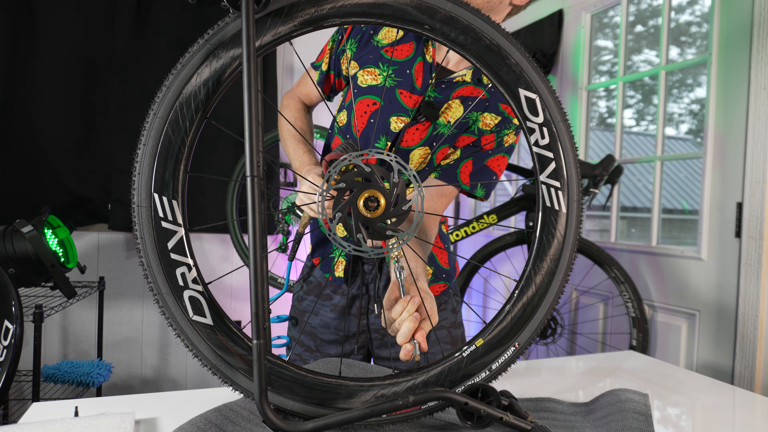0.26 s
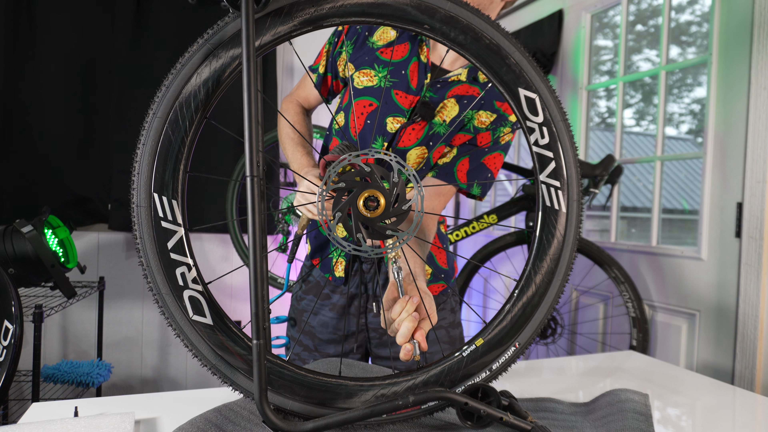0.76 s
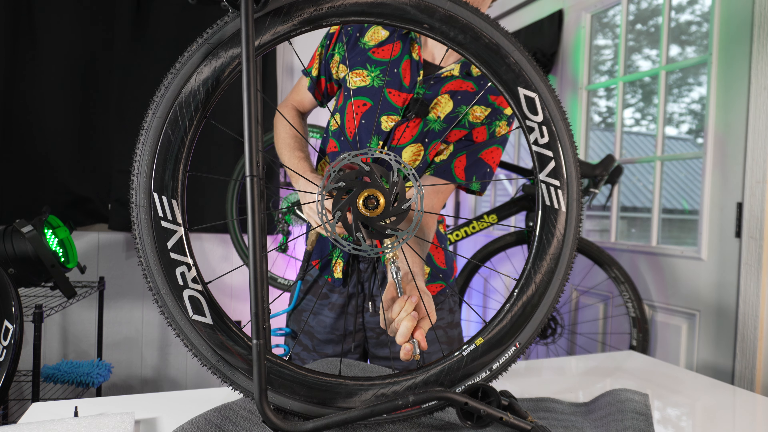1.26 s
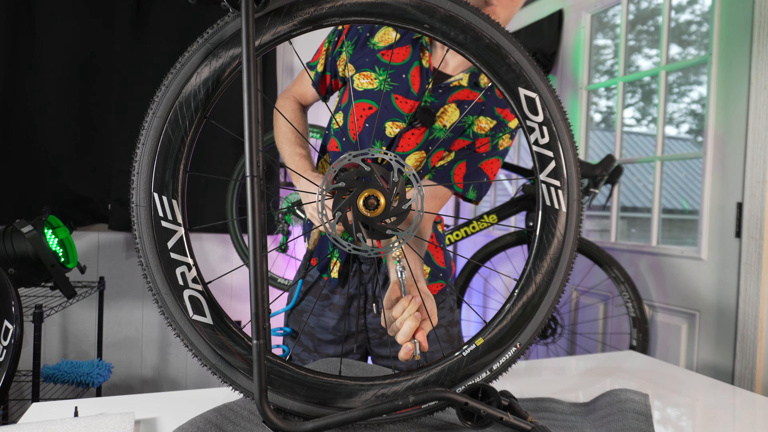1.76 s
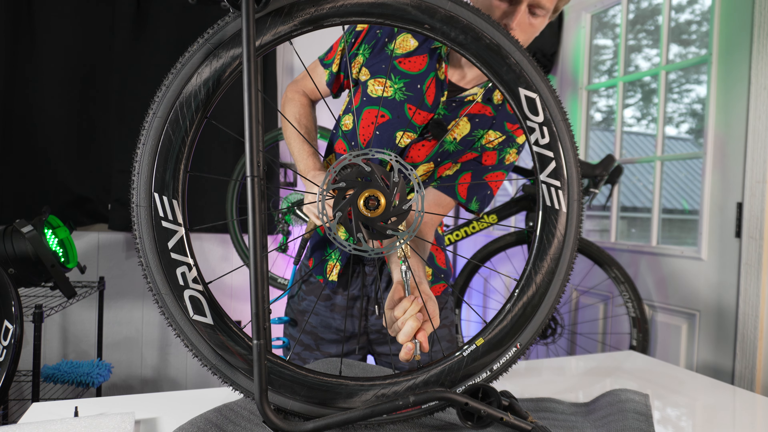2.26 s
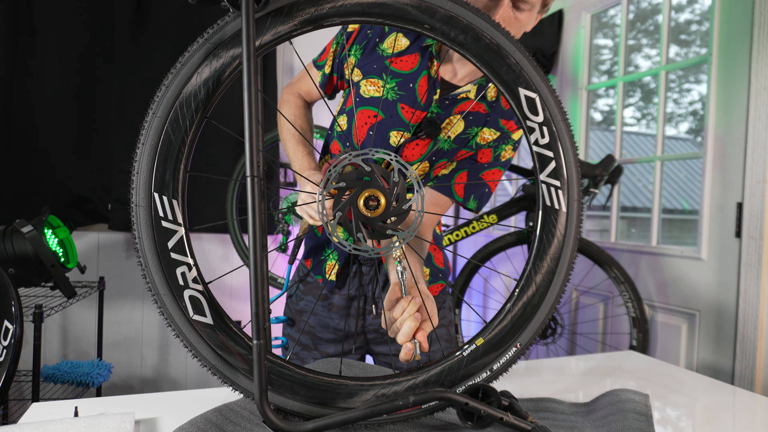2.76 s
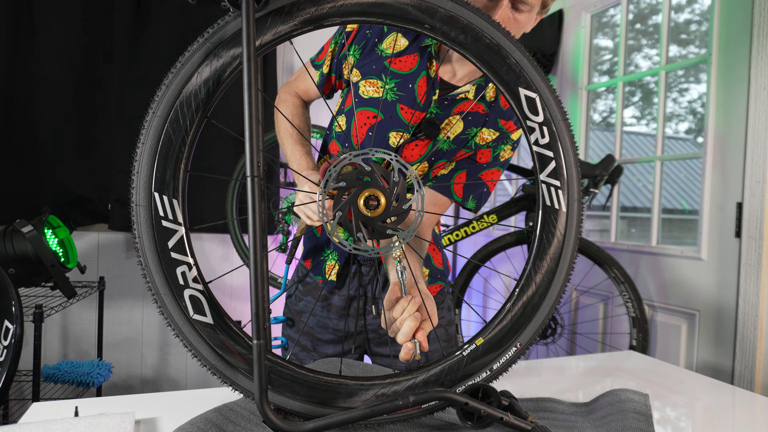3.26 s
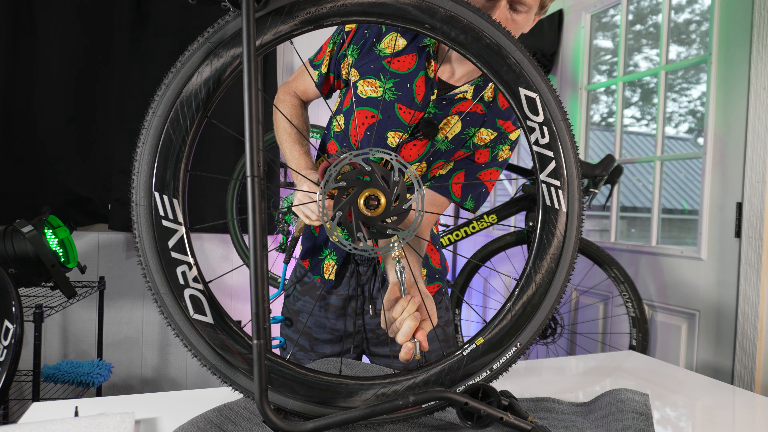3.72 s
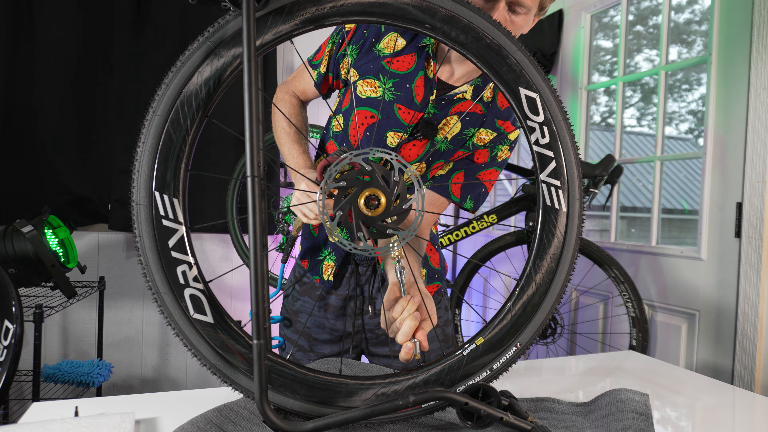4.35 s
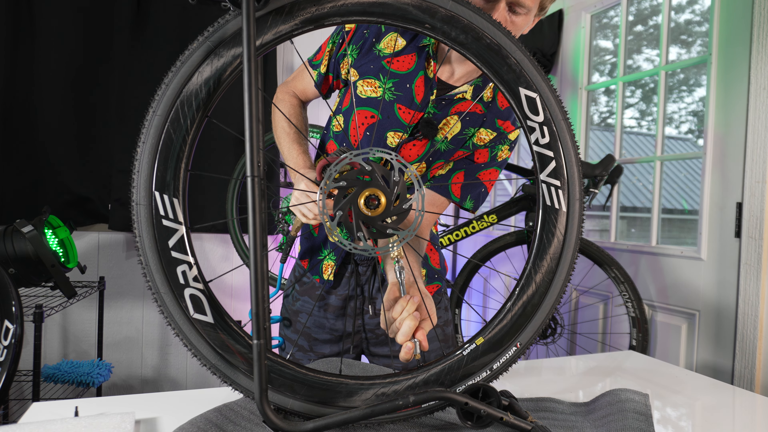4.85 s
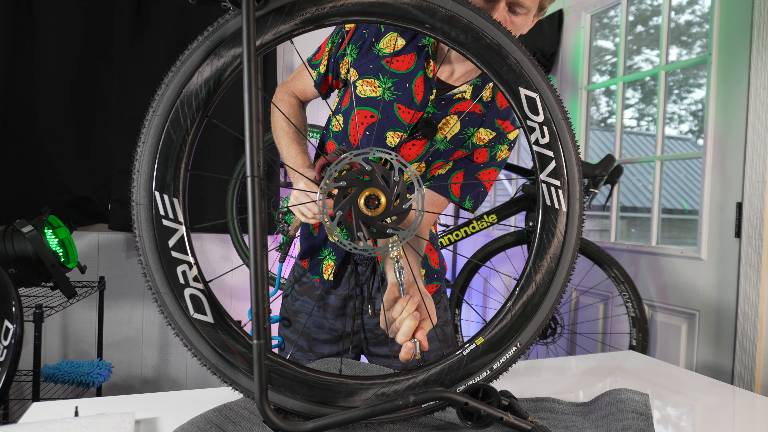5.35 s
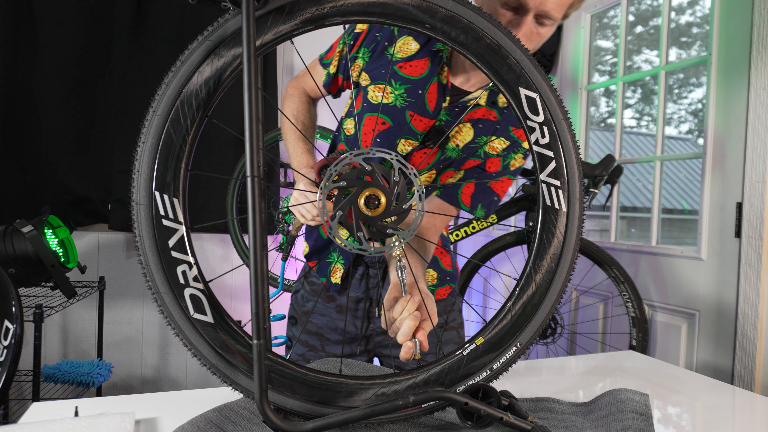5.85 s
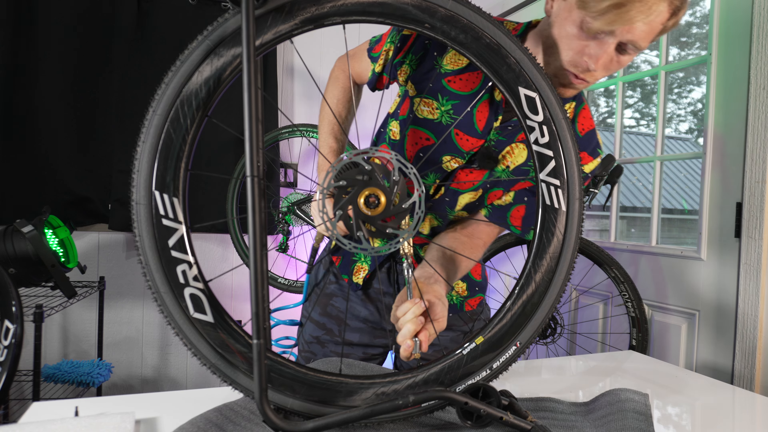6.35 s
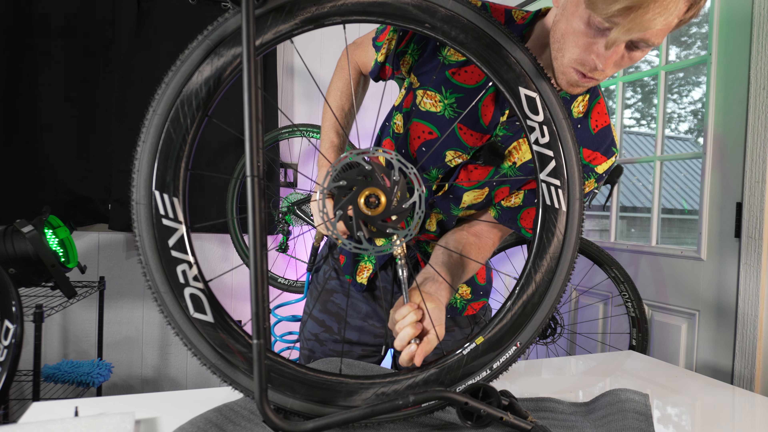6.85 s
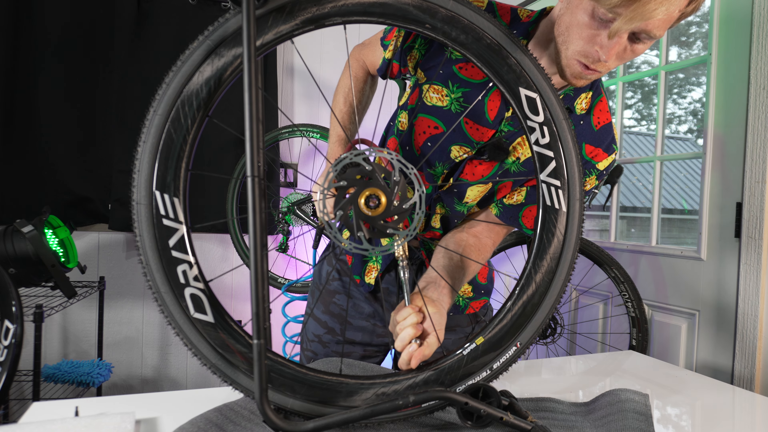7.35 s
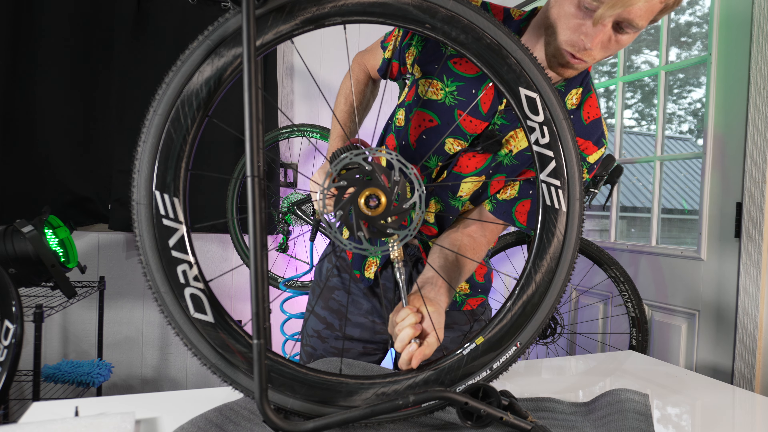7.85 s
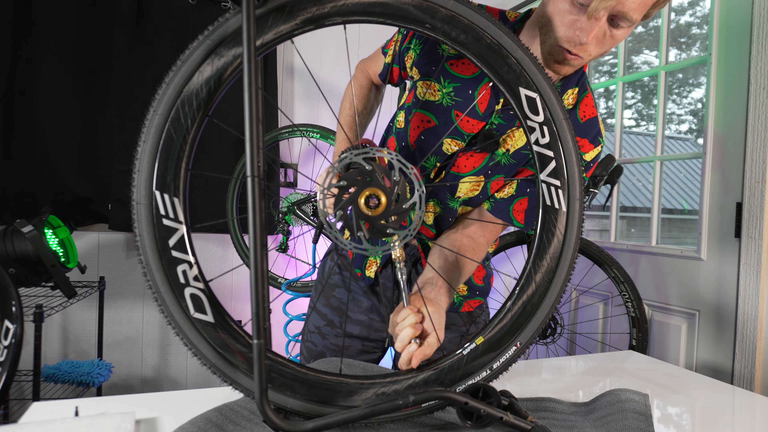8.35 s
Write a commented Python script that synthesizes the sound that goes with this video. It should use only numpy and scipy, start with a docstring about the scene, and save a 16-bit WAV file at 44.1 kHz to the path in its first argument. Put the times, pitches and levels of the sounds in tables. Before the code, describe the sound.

In a small workshop, a close microphone hears bright compressed air hissing and faintly singing through a tire valve. A trigger snaps, the hiss drops to a seep, then another snap restarts it. Tiny ticks and a sharp tire knock follow. Hands rumble and scrape the wheel, then air blasts out in a loud breathy jet, with a hard click before it fades to a thin leak.

```python
"""A small workshop: a bicycle tire is filled from a compressed-air inflator, heard by one microphone.
Air leaks at the chuck as coloured noise and sings in the valve as noise caught in resonances.
The trigger snaps shut and open, the tire ticks and knocks on its rim as it swells: noise bursts, damped modes.
The chuck is worked loose with rumbles and scrapes; air blows off in a loud fluttering, whistling jet
for a second, and a thinner leak goes on."""
import sys
import numpy as np
from scipy import signal
from scipy.fft import rfft, irfft, next_fast_len
from scipy.io import wavfile
from scipy.ndimage import map_coordinates

SR = 44100
rng = np.random.default_rng(int(sys.argv[2]) if len(sys.argv) > 2 else 0)


def log_audio(samples):
    """Write samples as a 16-bit WAV file to the path given in sys.argv[1]."""
    # one column per channel
    frames = np.atleast_2d(samples).T
    # limit to full scale, then quantise
    limited = np.clip(frames, -1, 1)
    pcm = np.round(limited * 32767).astype(np.int16)
    wavfile.write(sys.argv[1], SR, pcm)


N = 378378

# surges of the blow-off: (start [s], end [s], rise [s],
#   jet level [dB], low whistle level [dB], high whistle level [dB]), levels before the sag
SURGES = [(6.579, 6.743, .02, -27, -37.5, -30), (6.795, 7.687, .11, -28, -32, -25.5)]
# the trigger shuts and opens again; later the hands start to work the chuck loose
SHUT_S, OPEN_S, LOOSEN_S = 1.025, 1.9, 5.8


def amp(db):
    """Decibels to gain."""
    return 10 ** (np.asarray(db) / 20)


def unit(x):
    """Scale to rms 1."""
    return x / np.sqrt(np.mean(x ** 2) + 1e-20)


def clock():
    """The time of every sample [s]."""
    return np.arange(N) / SR


def since(start):
    """Seconds gone by after a moment, 0 before it."""
    return np.maximum(clock() - start, 0)


def along(points, hz):
    """Interpolate (Hz, value) points on a log frequency axis."""
    point_hz, value = np.transpose(points)
    return np.interp(np.log(hz + 1), np.log(point_hz + 1), value)


def ramp(start, end):
    """Rises from 0 to 1 between two times."""
    return np.clip((clock() - start) / max(end - start, 1 / SR), 0, 1)


def held(start, end, rise_s, fall_s):
    """An envelope that rises from its start, holds, and decays exponentially after its end."""
    return ramp(start, start + rise_s) * np.exp(-since(end) / fall_s)


def wobble(rate):
    """A smooth random curve, rate knots a second."""
    knots = rng.standard_normal(int(N * rate / SR) + 4)
    return map_coordinates(knots, [np.arange(N) * rate / SR])


def delayed(x, seconds):
    """x heard after a delay that may change with time."""
    return map_coordinates(x, [np.arange(N) - seconds * SR], mode="mirror")


def filtered(x, response):
    """Multiply the spectrum of x by a gain that depends on frequency."""
    size = next_fast_len(len(x) + SR // 4)
    hz = np.fft.rfftfreq(size, 1 / SR)
    return irfft(rfft(x, size) * response(hz), size)[:len(x)]


def bandpass(x, low_hz, high_hz):
    """Second-order Butterworth band."""
    return signal.lfilter(*signal.butter(2, [low_hz, high_hz], "band", fs=SR), x)


def add(track, s, sound):
    """Mix a sound into a track at a time."""
    part = track[round(s * SR):][:len(sound)]
    part += sound[:len(part)]


def rush(spectrum):
    """Turbulent noise of rms 1 with a broad colour."""
    return unit(filtered(rng.standard_normal(N), lambda hz: amp(along(spectrum, hz))))


def sing(peaks, wander, bend=0):
    """Turbulent noise of rms 1 in steep-sided resonances; pitch bends and wanders by a small share."""
    def gain(hz):
        power = 0
        for peak_hz, width_hz, db in peaks:
            detuning = (hz - peak_hz) / (width_hz * 2 / 3)
            power = power + amp(db) ** 2 / (1 + detuning ** 2) ** 2
        return np.sqrt(power)

    song = filtered(rng.standard_normal(N), gain)
    pitch_share = bend + wander * wobble(12)
    return unit(delayed(song, -np.cumsum(pitch_share) / SR))


def ring(modes, t, scatter_db):
    """Damped modes of alternating sign, struck at slightly new strengths each time."""
    total = np.zeros(len(t))
    for k, (hz, db, t60) in enumerate(modes):
        level_db = db + scatter_db * rng.standard_normal() - 60 * t / t60
        total += (-1) ** k * amp(level_db) * np.sin(2 * np.pi * hz * t)
    return total


def burst(t, t60):
    """A fast-dying puff of noise."""
    return rng.standard_normal(len(t)) * amp(-60 * t / t60)


def background(floor_db=-58.5, rush_db=-61.0, fade_db_per_s=6.5, rest_db=-77):
    """The room's steady floor and a soft low rush that dies down at the start."""
    # noise colour: (frequency [Hz], relative level [dB per Hz])
    floor_colour = [(20, 0), (40, 2.5), (70, -4.5), (95, -4), (120, 2), (160, -1.5), (250, -6.5),
                    (450, -5.5), (800, -10), (1500, -13.5), (2200, -33), (8000, -15.5)]
    rush_colour = [(120, -18), (350, 4), (900, -5), (1500, -12), (2200, -38)]
    rush_gain = amp(rush_db - fade_db_per_s * clock()) + amp(rest_db)
    return amp(floor_db) * rush(floor_colour) + rush_gain * rush(rush_colour)


def room(x, wet_db):
    """The workshop's short tail: noise whose decay time depends on frequency."""
    # reverberation: (frequency [Hz], t60 [s])
    decay = [(150, 0.24), (600, 0.6), (2000, 0.38), (6000, 0.24), (14000, 0.25)]
    hz, t, z = signal.stft(rng.standard_normal(SR // 2), SR, nperseg=256)
    t60 = along(decay, hz)[:, None]
    tail = signal.istft(z * amp(-60 * t / t60), SR, nperseg=256)[1]
    tail[:SR // 250] = 0
    return x + amp(wet_db) * signal.fftconvolve(x, tail / np.linalg.norm(tail))[:N]


def near_echoes(x, echo_db, nearest_s, farthest_s, count=12):
    """Fingers, rim and bench mirror the hiss and comb it; the comb slides as the hand moves."""
    drift_s, slide_s = .0002, .0015
    shift_s = drift_s * wobble(0.99) + slide_s * ramp(LOOSEN_S, SURGES[-1][0])
    delays_s = np.geomspace(nearest_s, farthest_s, count)
    echoes = np.zeros(N)
    for delay_s, (sign, offset, lean) in zip(delays_s, rng.standard_normal((count, 3))):
        echoes += np.sign(sign) * delayed(x, delay_s * (1 + 0.0767 * offset) + lean * shift_s)
    return (x + amp(echo_db) * echoes / np.sqrt(count)) / np.sqrt(1 + amp(echo_db) ** 2)


def handling(uneven_db=2, scrape_uneven_db=3.1):
    """Hands work the chuck loose: the wheel rumbles under pushes and the stem scrapes."""
    # pushes of the hands on the wheel: (start [s], end [s], level [dB])
    pushes = [(5.667, 5.74, -58.5), (5.97, 6.071, -45), (6.094, 6.186, -42.5), (6.303, 6.528, -47),
              (6.6, 6.85, -58.5)]
    # rumble and scrape colour: (frequency [Hz], relative level [dB per Hz])
    rumble_colour = [(12, -35), (20, 3.5), (43, -2), (127, -12), (177, -20.5), (273, -26.5), (500, -27.5),
                     (650, -38), (1100, -120)]
    scrape_colour = [(150, -12), (350, -1), (1500, 0), (3000, -7), (8000, -24)]
    # scrapes of the chuck on the stem: (centre [s], level [dB], Gaussian length [s])
    scrapes = [(1.32, -63, .015), (5.491, -58.5, 0.017), (5.746, -58.5, 0.018), (6.309, -51, 0.0059),
               (6.351, -48, 0.019), (6.658, -48, 0.043)]
    push_rise_s, push_fall_s = 0.033, 0.042
    force = sum(amp(db) * held(start, end, push_rise_s, push_fall_s) for start, end, db in pushes)
    rumble = force * amp(uneven_db * wobble(25)) * rush(rumble_colour)
    strokes = sum(amp(db) * np.exp(-.5 * ((clock() - s) / length_s) ** 2)
                  for s, db, length_s in scrapes)
    grating = unit(rush(scrape_colour) * amp(scrape_uneven_db * wobble(400)))
    return rumble + strokes * grating


def knocks(ring_db=-6, push_db=9, push_s=0.00057, lowest_share=0.51):
    """The tire jumps against the rim: one push and a brief shudder, then the wheel rings."""
    # knocks: (time [s], level [dB], softened above [Hz], relative shudder level [dB], shudder t60 [s])
    blows = [(2.73, -47.5, 124, 4, 0.2), (3.9899, -28, 2470, -7, .04), (6.804, -37, 430, 0, 0.16)]
    # the wheel's modes: (frequency [Hz], relative level [dB], t60 [s])
    wheel = [(104, -17, 0.19), (147, -25, .18), (241, -5.5, 0.056), (286, -1, 0.055), (396, -19, 0.043),
             (430, -17.5, 0.62), (554, -4.5, 0.072), (660, -16, 0.47), (885, -0.5, 0.026),
             (1037, -7, 0.089), (1230, -5, 0.039), (1453, -3, 0.13), (1800, -5, 0.034), (2040, 4, 0.017),
             (3100, -24, .015)]
    track, t = np.zeros(N), np.arange(SR // 2) / SR
    push = (1 - t / push_s) * np.exp(-t / push_s)
    for s, db, soft_hz, shudder_db, shudder_t60 in blows:
        hit = amp(push_db) * push + amp(ring_db) * ring(wheel, t, scatter_db=0.5)
        # soft rubber passes on only the lower tones
        hit = signal.lfilter(*signal.butter(3, soft_hz, fs=SR), hit)
        shudder = unit(bandpass(rng.standard_normal(len(t)), soft_hz * lowest_share, soft_hz))
        shudder *= amp(shudder_db - 60 * t / shudder_t60) / 2
        add(track, s, amp(db) * (hit + shudder))
    return track


def ticks(level_db=-2, t60=0.0055):
    """The stretching tire creeps on the rim in tiny dry slips, each a puff of noise."""
    # slips: (time [s], relative level [dB])
    slips = [(2.167, -31), (2.279, -27.5), (2.3304, -31), (2.3614, -38), (2.4314, -33.5), (4.0742, -28),
             (4.9885, -27.5)]
    # tick colour: (frequency [Hz], gain [dB])
    colour = [(1500, -39), (3500, -2.5), (5500, 3.5), (8500, 8), (12000, -16), (16000, -20)]
    track, t = np.zeros(N), np.arange(SR // 50) / SR
    for s, db in slips:
        add(track, s, amp(db + level_db) * burst(t, t60))
    return filtered(track, lambda hz: amp(along(colour, hz)))


def snaps(ring_db=-10, crack_t60=0.014):
    """Each snap of trigger or chuck cracks and rings the inflator, most strongly round one pitch."""
    # snaps: (time [s], level before the band filter [dB], band centre [Hz],
    #   spread each way [octaves], relative crack level [dB])
    hits = [(1.0175, -34, 2000, 1.6, 1), (1.0278, -18, 2600, 0.17, -3), (1.0292, -24, 11000, .6, 2),
            (1.0296, -17.5, 5230, .35, 1.5), (1.0304, -20.5, 1080, 0.2, -2), (1.145, -46, 2400, 1.1, 2),
            (1.9073, -20.5, 4300, 0.53, 3), (1.9098, -23.5, 1700, 0.55, -4), (1.913, -29, 3500, 1.3, 1),
            (6.372, -26, 3100, .55, 0), (7.2057, -21.5, 4000, 1.4, 0.5), (7.2085, -15.5, 2800, 0.71, -8)]
    # the inflator's modes: (frequency [Hz], relative level [dB], t60 [s])
    inflator = [(1130, -12, 0.057), (1276, -14, 0.035), (1660, -9, 0.04), (2205, -7.5, 0.023),
                (2600, -4.5, 0.022), (2990, 1, 0.014), (3740, 2, 0.013), (4370, -7.5, 0.017),
                (5090, -6, 0.016), (5400, -4, 0.014), (6800, 0, 0.0094)]
    track, t = np.zeros(N), np.arange(SR // 5) / SR
    for s, db, bright_hz, octaves, crack_db in hits:
        hit = amp(ring_db) * ring(inflator, t, scatter_db=1) + amp(crack_db) * burst(t, crack_t60)
        hit = bandpass(hit, bright_hz / 2 ** octaves, bright_hz * 2 ** octaves)
        add(track, s, amp(db) * hit)
    return track


def valve(start, end, peaks, level_db, fade_db, flutter_db, wander, bend=0, flank_s=0.018):
    """The valve sings while air runs in, and fades ever faster as the tire's pressure rises."""
    level_db = level_db - fade_db * ramp(start, end) ** 1.6 + flutter_db * wobble(34.9)
    return held(start, end, flank_s, flank_s) * amp(level_db) * sing(peaks, wander, bend)


def fills():
    """The valve sings in two fills; the first starts sharp and settles to its resting pitch."""
    # valve resonances in each fill: (frequency [Hz], nominal width [Hz], relative level [dB])
    first_peaks = [(2616, 150, -5.5), (2847, 87, 0.5), (3244, 97, -3), (4170, 170, -16), (5880, 260, -11),
                   (7050, 260, -11)]
    second_peaks = [(2556, 290, -6), (3257, 190, -0.5), (3476, 260, -2), (4165, 79, -2.5), (5300, 240, -9),
                    (5810, 220, -6)]
    sharp_share, settle_s = .12, .11
    bend = sharp_share * np.exp(-clock() / settle_s)
    first = valve(0, SHUT_S, first_peaks, level_db=-57, fade_db=3.0, flutter_db=2.5,
                  wander=.012, bend=bend)
    second = valve(OPEN_S, LOOSEN_S, second_peaks, level_db=-54.0, fade_db=9, flutter_db=0.5,
                   wander=.004)
    return first + second


def leak(flutter_db=0.44):
    """Air escapes round the chuck; pressure and gap width set its level, the gap's shape its colour."""
    # leak colour for each seating of the chuck: (frequency [Hz], relative level [dB per Hz])
    seat_first = [(500, -15.5), (2000, -18), (4000, -13.5), (5500, -14), (7200, -9), (8700, -9.5),
                  (9400, -4.5), (11700, 1.5), (12900, -1.5), (13900, -9), (14800, 0), (15800, -14)]
    seat_fill = [(500, -24.5), (2000, -21), (3000, -16.5), (4800, -18), (6500, -12.5), (7600, -11.5),
                 (9300, -5), (10900, -0.5), (12100, -5.5), (12600, -6.5), (13300, -6), (13700, -11),
                 (14300, -2.5), (15800, -9)]
    seat_loose = [(470, -27), (800, -16.5), (2280, -11), (2680, -12), (3000, -11), (3990, -17.5),
                  (4570, -12), (6020, -8), (6570, -6), (10500, 0.5), (15700, -0.5)]
    seat_last = [(500, -19.5), (1600, -18.5), (2250, -10), (2550, -15), (3000, -13), (4500, -17),
                 (6300, -13.5), (7400, -6), (9000, -8.5), (11800, -0.5), (13400, -1), (15000, -4.5),
                 (15800, -13)]
    # the chuck shifts from one seating to the next: (start [s], end [s])
    shifts = [(1.89, 1.9), (5.7, 6), (6.4, 7.6)]
    start_db, growth_db_per_s, last_db = -43, 0.39, -42
    seep_db, drain_s = -8, .09
    tilt_db, tilt_rise_s, tilt_end_s, tilt_fall_s = 4.5, 0.31, 6.29, 0.18

    # trigger shut: the hose drains and the hiss sinks to a seep
    drained = (1 - np.exp(-since(SHUT_S) / drain_s)) * (clock() < OPEN_S)
    # tilting the chuck widens the gap for a moment
    tilt = held(LOOSEN_S, tilt_end_s, tilt_rise_s, tilt_fall_s)
    level_db = start_db + growth_db_per_s * clock() + seep_db * drained + tilt_db * tilt
    # settles at its last level over the final surge
    level_db += (last_db - level_db) * ramp(*SURGES[-1][:2])
    hiss = rush(seat_first)
    for (start, end), seat in zip(shifts, [seat_fill, seat_loose, seat_last]):
        turn = np.pi / 2 * ramp(start, end)  # equal-power crossfade
        hiss = np.cos(turn) * hiss + np.sin(turn) * rush(seat)
    return amp(level_db + flutter_db * wobble(60)) * hiss


def surges(voice, sag_db_per_s, close_s=0.068):
    """One voice of the blow-off: each surge rises, sags with the pressure, dies as the gap closes."""
    total = np.zeros(N)
    for start, end, rise_s, *levels_db in SURGES:
        level_db = levels_db[voice] - sag_db_per_s * since(start)
        total += held(start, end, rise_s, close_s) * amp(level_db)
    return total


def blow_off(flutter_db=0.43, sputter_db=0.85, waver_db=1.3):
    """The gap opens wide: an unsteady jet with two groups of breathy whistles."""
    # jet colour: (frequency [Hz], relative level [dB per Hz])
    jet_colour = [(300, -19), (950, -23), (1700, -12), (2100, -19), (2700, -14.5), (3350, -18), (3900, -10),
                  (5700, -10), (7200, -7), (8300, -1), (10800, 3), (14300, 0), (15000, 2.5), (15800, -6.5)]
    # edge resonances of the open gap: (frequency [Hz], nominal width [Hz], relative level [dB])
    low_peaks = [(8450, 270, -7), (9330, 300, 1), (9740, 290, -1)]
    high_peaks = [(11430, 380, -3.5), (12140, 270, 4), (12900, 480, 1.5), (14400, 350, -10)]
    jet = surges(0, sag_db_per_s=6.5)
    low = surges(1, sag_db_per_s=6)
    high = surges(2, sag_db_per_s=18)
    start, end = SURGES[0][0], SURGES[-1][1]
    # as the gap narrows, the whistles creep up in pitch
    climb_share_per_s = .03
    bend = climb_share_per_s * (end - start) * (ramp(start, end) - .5)
    air = jet * near_echoes(rush(jet_colour), echo_db=-6.5, nearest_s=0.000698, farthest_s=.004)
    air += low * amp(waver_db * wobble(70)) * sing(low_peaks, wander=.004, bend=bend)
    air += high * amp(waver_db * wobble(70)) * sing(high_peaks, wander=.004, bend=bend)
    # the flapping seal shakes the whole jet
    return amp(flutter_db * wobble(120) + sputter_db * wobble(600)) * air


def scene():
    """Air, contacts and room, all at one microphone."""
    contacts = room(knocks(), wet_db=-9.5) + room(snaps() + ticks(), wet_db=-14.0)
    hiss = near_echoes(leak(), echo_db=-12.5, nearest_s=0.000805, farthest_s=.006)
    air = fills() + hiss + blow_off()
    mono = background() + handling() + contacts + air
    return np.array([mono, mono])


def record(dry):
    """The recorder keeps nothing above its band limit."""
    top_hz = 15780
    return np.array([filtered(channel, lambda hz: hz < top_hz) for channel in dry])


dry = scene()
out = record(dry)
log_audio(out)
```